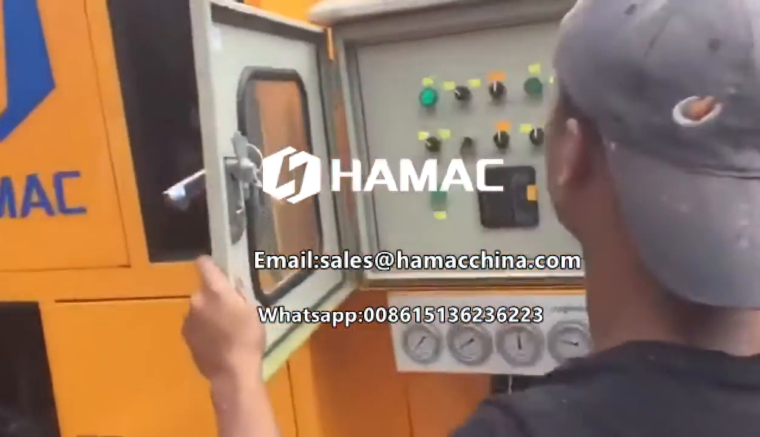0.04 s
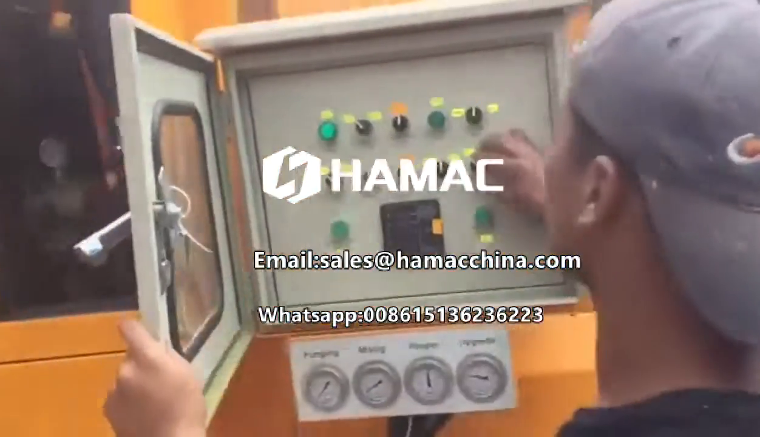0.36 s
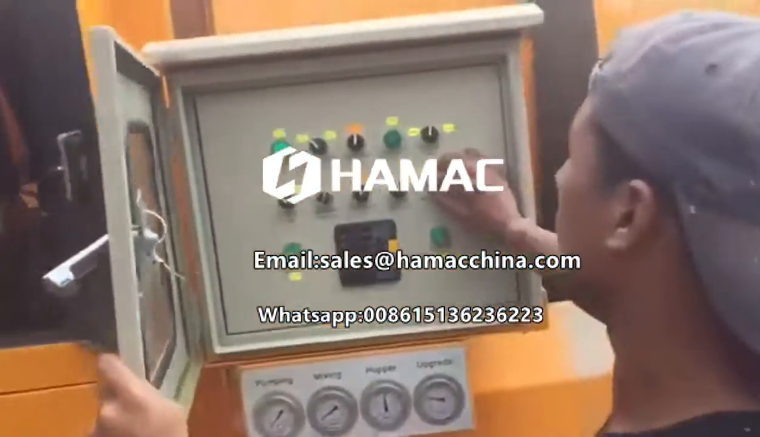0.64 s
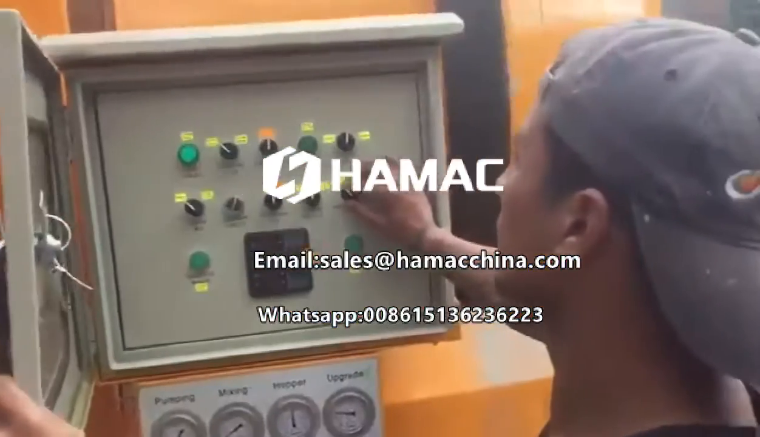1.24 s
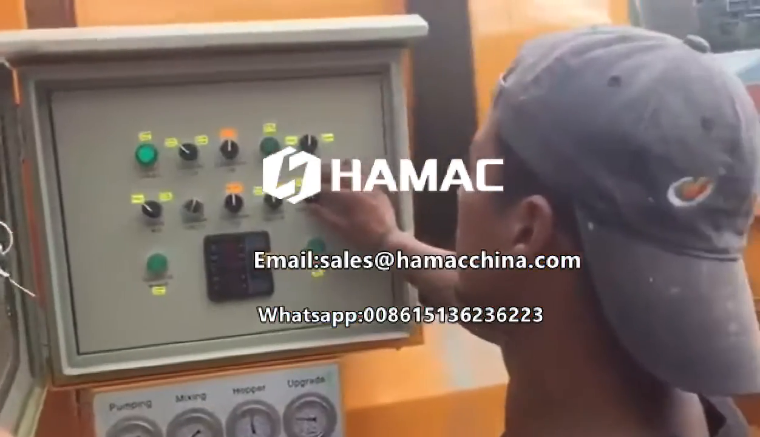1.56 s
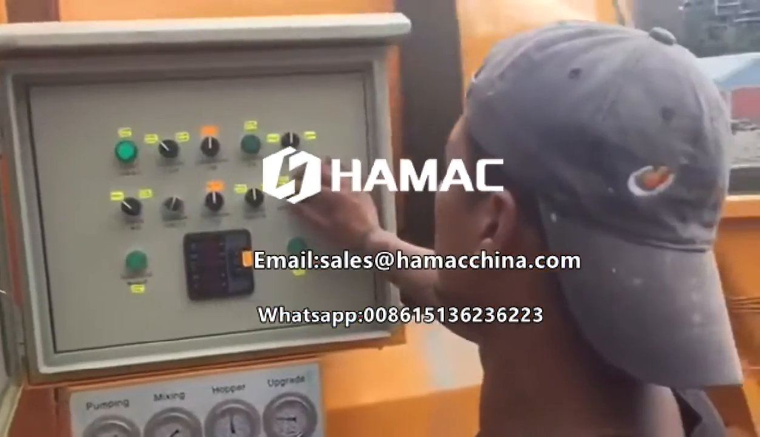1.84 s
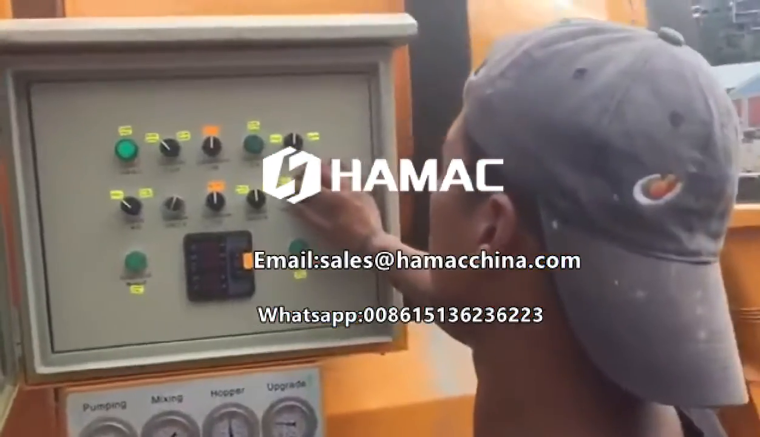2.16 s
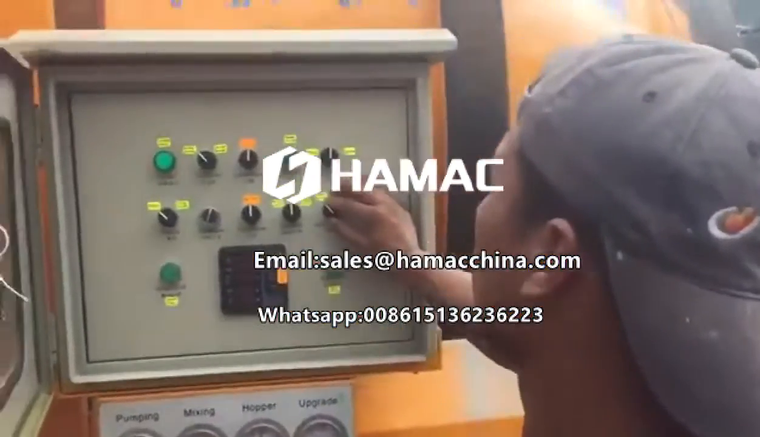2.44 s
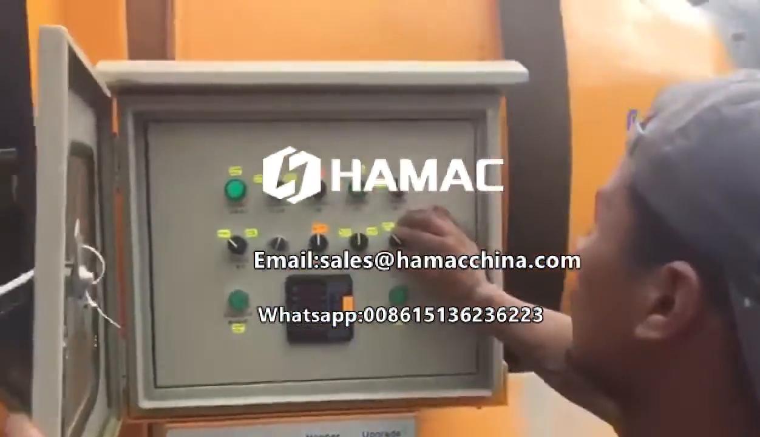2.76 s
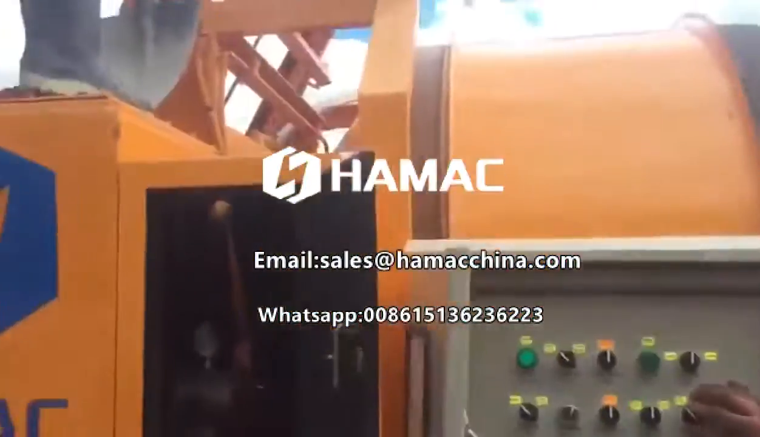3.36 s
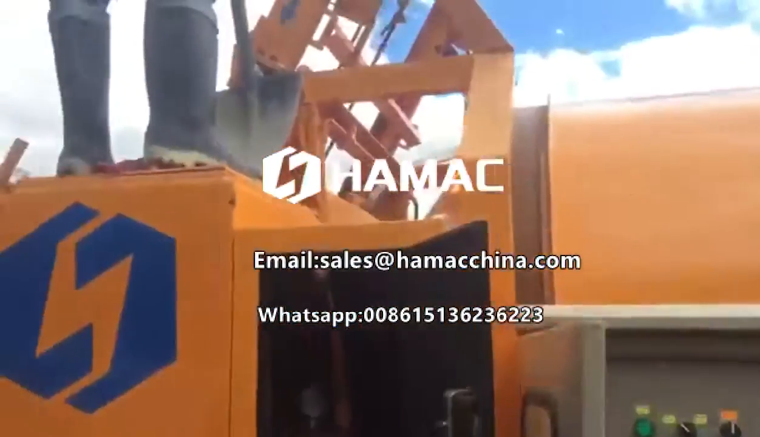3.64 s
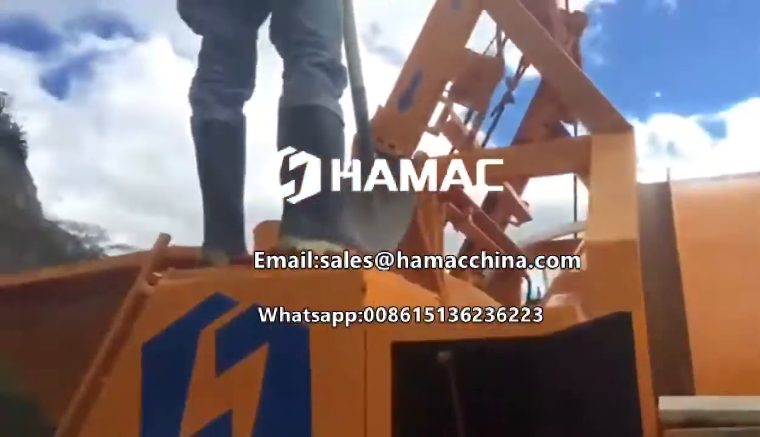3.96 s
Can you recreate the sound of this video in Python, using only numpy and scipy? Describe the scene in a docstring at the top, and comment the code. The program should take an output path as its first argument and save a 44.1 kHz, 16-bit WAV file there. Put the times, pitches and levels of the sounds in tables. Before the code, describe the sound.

A loud diesel drone runs without a break, heard from right beside a concrete mixer pump outdoors. A metal door gives one quick rattle early on, and pulsing fan noise, a low hum and spills of gravel continue throughout.

```python
"""Outdoors, at the control panel of a concrete mixer pump running at steady speed.
A four-cylinder diesel drones in harmonics of its crank rate; its firings excite resonances of the
block and housing, and loose covers ring. A cooling fan hums and roars, modulated by a drive that
throbs about five times a second. A second low hum wanders in pitch, wet gravel slides in the
turning drum, and the cabinet door rattles once."""
import sys
import numpy as np
from scipy import signal
from scipy.fft import rfft, irfft
from scipy.io import wavfile

SR = 44100
rng = np.random.default_rng(int(sys.argv[2]) if len(sys.argv) > 2 else 0)


def dump(signal):
    """Clip the signal to [-1, 1] and save it as 16-bit WAV at the path in sys.argv[1]."""
    limited = np.clip(np.atleast_2d(signal).T, -1, 1)
    pcm = np.round(limited * 32767).astype(np.int16)
    wavfile.write(sys.argv[1], SR, pcm)


N = 176400
T = np.arange(N) / SR
CRANK_HZ, THROB_HZ, FAN_HZ = 25.958, 5.43, 138.52


def from_db(db):
    """Decibels to amplitude ratio."""
    return 10 ** (np.asarray(db) / 20)

def unit_rms(x):
    """Normalisation to unit power."""
    return x / np.sqrt(np.mean(x ** 2) + 1e-20)

def in_time(rows):
    """Linear interpolation of (seconds, value) rows at every sample."""
    return np.interp(T, *np.transpose(rows))

def drift(corner_hz):
    """Low-passed noise: a slow random fluctuation of about unit spread."""
    step = 40  # samples per random value
    pole = np.exp(-2 * np.pi * corner_hz * step / SR)
    slow = signal.lfilter([1], [1, -2 * pole, pole ** 2], rng.standard_normal(N // step + 2002))[2000:]
    return np.interp(np.arange(N) / step, np.arange(len(slow)), unit_rms(slow))

def coloured(x, spectrum):
    """Spectral shaping by (Hz, dB) rows, at unit power."""
    hz, db = np.transpose(spectrum)
    bins = np.maximum(np.arange(N // 2 + 1) * SR / N, 1)
    gain = from_db(np.interp(np.log(bins), np.log(hz), db))
    return unit_rms(irfft(rfft(x) * gain, N))

def swells(rows):
    """A gain with a Gaussian rise or dip in decibels at each (seconds, width, dB) row."""
    return from_db(sum(db * np.exp(-((T - s) / width) ** 2) for s, width, db in rows))

def impacts(per_s, spread_db, range_db):
    """A Poisson process: independent impulses, many soft and a few hard."""
    sizes = from_db(np.minimum(spread_db * rng.exponential(1, N), range_db)) * rng.choice([-1, 1], N)
    return sizes * (rng.random(N) < per_s / SR)


# Spectrum of the rushing air. Each row: frequency in Hz, relative density in dB.
AIR_SPECTRUM = [(20, -6.5), (42, -2.5), (62, 2.5), (90, 4), (160, 1.5), (300, 1), (420, -2), (520, -3.5),
                (750, -3.5), (1100, -6), (1500, -5.5), (2100, -6), (2900, -7.5), (3500, -8.5), (4500, -12),
                (4950, -17), (5650, -13), (6700, -18), (7600, -24.5)]
# Bands that flicker independently. Each entry: band edge in Hz.
AIR_BAND_EDGES = [0, 350, 700, 1400, 2800, 4200, 22050]

def air_roar(turns, throb):
    """Amplitude-modulated noise: rushing air swells with each throb and pulses with the crank."""
    air = rfft(coloured(rng.standard_normal(N), AIR_SPECTRUM))
    hz = np.arange(N // 2 + 1) * SR / N
    out = 0
    for low, high in zip(AIR_BAND_EDGES, AIR_BAND_EDGES[1:]):
        band = irfft(air * (hz >= low) * (hz < high), N)
        angle = 2 * np.pi * (turns + rng.random() / 2)
        pulsing = 1 + 0.18 * (np.cos(angle) + np.cos(7 * angle)) / np.pi
        flicker = from_db(drift(13.4))
        out += band * pulsing * flicker
    return from_db(-20.5 + .5 * np.cos(2 * np.pi * throb)) * out


# Pitch of the low hum. Each row: time in seconds, frequency in Hz.
HUM_PITCH = [(0, 66.2), (1.0, 66.67), (1.7, 67.2), (2.2, 67.7), (3.0, 68.44), (4.0, 67.85)]
# Strength of its fundamental. Each row: time in seconds, level in dB.
HUM_LEVEL = [(0, -26), (.3, -28), (.45, -20), (.62, -25), (.78, -17.5), (.93, -25), (1.08, -20),
             (1.22, -24.5), (1.44, -17), (1.58, -25), (1.82, -18), (2.08, -25.5), (2.3, -19), (2.7, -19),
             (3.03, -23), (3.35, -18.5), (3.68, -22.5), (4, -15.5)]

def low_hum(octave_db=-9):
    """Frequency modulation: a tone and its octave, probably the hydraulic drive, wander under load."""
    phase = 2 * np.pi * np.cumsum(in_time(HUM_PITCH) + 0.45 * drift(3.3)) / SR
    wave = np.sin(phase) + from_db(octave_db) * np.sin(2 * phase)
    return np.sqrt(2) * from_db(in_time(HUM_LEVEL)) * wave


# Taps of the door as it is pushed open. Each row: start in seconds, level in dB.
DOOR_TAPS = [(0.315, -14), (.326, -17), (0.336, -20.5)]
# Spectrum of the door. Each row: frequency in Hz, relative density in dB.
DOOR_SPECTRUM = [(200, -11), (650, -6), (1300, 2), (2800, -5), (4200, -11.5), (5000, -3), (5600, -5),
                 (7600, -9.5)]

def door_rattle(decay_s=0.013):
    """Damped impacts: each tap of the steel door and latch is noise that decays exponentially."""
    taps = sum(from_db(db) * (T >= s) * np.exp(-np.abs(T - s) / decay_s) for s, db in DOOR_TAPS)
    return taps * coloured(rng.standard_normal(N), DOOR_SPECTRUM)


# Slides of gravel. Each row: crest time in seconds, fall time in seconds, level in dB.
GRAVEL_SLIDES = [(0.023, 0.015, -18), (0.183, 0.046, -22), (0.236, 0.034, -20.5), (0.33, 0.065, -20.5),
                 (0.433, 0.041, -19), (0.548, 0.073, -18.5), (0.699, 0.032, -20.5), (0.738, 0.027, -22),
                 (0.807, 0.021, -21), (.95, .04, -19.5), (1.07, 0.039, -21.5), (1.118, 0.028, -32),
                 (1.285, .03, -22), (1.357, 0.019, -18), (1.452, 0.026, -22), (1.67, 0.044, -21.5),
                 (1.727, 0.043, -21), (1.84, 0.033, -18), (1.99, 0.019, -30), (2.207, 0.049, -20),
                 (2.3, .03, -27), (2.39, 0.037, -20.5), (2.51, 0.037, -22), (2.573, .03, -22.5),
                 (2.718, .04, -25), (2.957, 0.022, -19), (3.191, 0.043, -18.5), (3.311, 0.043, -28.5),
                 (3.509, 0.035, -17.5), (3.651, .03, -21.5), (3.714, .03, -22), (3.856, 0.038, -20),
                 (3.909, .03, -18.5)]
# Spectrum of the gravel. Each row: frequency in Hz, relative density in dB.
GRAVEL_SPECTRUM = [(200, -10), (600, -2.5), (1300, -1.5), (2700, 1), (3400, -4), (4300, -8.5), (4950, -13),
                   (5400, -5.5), (6200, -11.5), (7600, -13)]

def gravel(rise_ratio=.6):
    """Superposed impacts: stones on the steel drum merge into spills that rise faster than they die."""
    envelope = 0
    for crest, fall, db in GRAVEL_SLIDES:
        width = fall * np.where(T < crest, rise_ratio, 1)
        envelope += from_db(db) * np.exp(-2 * ((T - crest) / width) ** 2)
    stones = impacts(per_s=2500, spread_db=1.5, range_db=6)
    return envelope * coloured(stones, GRAVEL_SPECTRUM)


# Fan partials. Each row: multiple of the fan tone, offset in throb rates, level in dB.
FAN_PARTIALS = [(.5, 0, -34), (1, 0, -19.5), (1, 1, -30), (2, 0, -36), (2, -1, -38)]
# The tone dips on some throbs. Each row: centre in seconds, width in seconds, gain in dB.
FAN_DIPS = [(.27, 0.019, -9), (.45, 0.034, -6), (.84, .05, -5), (1.03, 0.043, -6), (1.23, 0.033, -9.5),
            (1.42, 0.028, -10), (1.59, 0.032, -6), (1.76, 0.034, -4), (2.11, .03, -14), (2.47, 0.041, -15),
            (3.04, 0.049, -19), (3.42, 0.043, -15), (3.79, 0.022, -11)]

def fan_tone(throb):
    """Beating: sidebands one throb rate from the fan's partials make it pulse with the drive."""
    blades = FAN_HZ * T + rng.random() + 0.018 * drift(2.1)
    tone = sum(from_db(db) * np.sin(2 * np.pi * (multiple * blades + offset * throb))
               for multiple, offset, db in FAN_PARTIALS)
    return np.sqrt(2) * swells(FAN_DIPS) * tone


# Modes of the steel covers. Each row: frequency in Hz, time to decay 60 dB in seconds, level in dB.
COVER_MODES = [(940, .05, -40), (1076, 0.05, -39.5), (1191, 0.093, -36), (1257, 0.071, -39.5),
               (1482, 0.038, -41.5), (1690, 0.071, -38), (1858, 0.078, -41), (2054, .06, -40),
               (2220, 0.09, -37), (2497, 0.09, -38), (2635, .06, -41.5), (2680, 0.1, -37),
               (2755, 0.068, -39.5), (2915, 0.076, -39), (3056, 0.072, -40), (3380, 0.056, -43),
               (3960, 0.03, -42.5), (4480, .04, -45), (5270, 0.038, -43), (5330, 0.024, -46),
               (5640, 0.034, -46.5), (6600, 0.041, -49.5)]

def loose_covers():
    """Free vibration: each cover, tapped at random, rings as a damped oscillator."""
    out = 0
    for hz, t60, db in COVER_MODES:
        taps = impacts(per_s=24, spread_db=3.5, range_db=10.5)
        radius = from_db(-60 / (t60 * SR))
        feedback = [1, -2 * radius * np.cos(2 * np.pi * hz / SR), radius ** 2]
        out += from_db(db) * unit_rms(signal.lfilter([1, 0, -1], feedback, taps + 1e-18))
    return out


def firings(turns, decay_s, uneven_db=0.4):
    """Pulsed excitation: two decaying noise bursts per crank turn, slightly unequal in strength."""
    count = np.floor(2 * turns).astype(int)
    strength = from_db(uneven_db * rng.standard_normal(512))
    age_s = (2 * turns % 1) / (2 * CRANK_HZ)
    return strength[count % len(strength)] * np.exp(-age_s / decay_s) * rng.standard_normal(N)

def driven_modes(turns, modes, decay_s):
    """Forced resonance: every mode is excited once per firing, at a crank angle of its own."""
    out = 0
    for hz, half_width, db in modes:
        force = firings(turns + rng.random(), decay_s)
        band = signal.butter(1, [hz - half_width, hz + half_width], "band", fs=SR, output="sos")
        ringing = signal.sosfilt(band, signal.sosfilt(band, force))  # twice, for steep flanks
        out += from_db(db) * unit_rms(ringing)
    return out


# Modes of the block and covers. Each row: frequency in Hz, filter half-width in Hz, level in dB.
BLOCK_MODES = [(556.5, 29, -39), (630.6, 42, -34.5), (939, 45, -36.5), (1173, 43, -39), (1582, 54, -41.5),
               (2244, 32, -43.5), (2460, 51, -40.5), (2704, 45, -39), (3700, 130, -47.5), (5310, 110, -43)]

def combustion_knock(turns):
    """Shock excitation: each combustion rings the block and covers."""
    return driven_modes(turns, BLOCK_MODES, decay_s=0.0083)


# Modes of the housing. Each row: frequency in Hz, filter half-width in Hz, level in dB.
HOUSING_MODES = [(199, 15, -33.5), (241.6, 36.5, -30.5), (293.3, 36, -31.5)]
# Sidebands of the housing tone. Each row: offset in throb rates, level in dB.
HOUSING_SIDEBANDS = [(-4, -37), (-3, -39), (-2, -38.5), (1, -36.5), (2, -32.5)]
# Swells as the engine takes load. Each row: centre in seconds, width in seconds, gain in dB.
LOAD_SWELLS = [(.055, .04, 6), (.131, 0.014, 5), (.224, 0.052, 3.5), (.55, 0.037, 4), (.75, 0.08, 2.5),
               (.933, 0.044, 6), (1.107, 0.025, 4.5), (1.17, 0.036, 7), (1.339, 0.029, 6),
               (1.61, 0.033, 6.5), (1.821, 0.064, 4), (2.014, 0.043, 1.5), (2.199, 0.042, 3.5),
               (2.363, .04, 3.5), (2.532, 0.028, 4.5), (2.614, 0.032, 5.5), (2.72, .04, -1),
               (2.792, 0.066, 6.5), (2.905, 0.047, 5.5), (3.053, 0.04, 0), (3.17, 0.055, 4),
               (3.353, .05, 7), (3.531, 0.022, 9.5), (3.719, 0.04, 5), (3.873, 0.058, 3)]

def housing_boom(turns, throb, order=12):
    """Resonance: exhaust pulses boom in the housing, and sidebands around one engine order warble."""
    boom = driven_modes(turns, HOUSING_MODES, decay_s=0.0048)
    warble = sum(from_db(db) * np.sin(2 * np.pi * (order * turns + offset * throb + rng.random()))
                 for offset, db in HOUSING_SIDEBANDS)
    return swells(LOAD_SWELLS) * (boom + np.sqrt(2) * warble)


# Engine orders. Each row: multiple of the crank rate, relative level in dB.
ENGINE_ORDERS = [(2, -25.5), (3, -29), (4, -30), (5, -36), (6, -37.5), (7, -36.5), (8, -35.5), (9, -43),
                 (10, -40.5), (12, -31.5), (14, -40), (15, -43), (16, -43), (17, -44.5), (18, -42),
                 (20, -43), (21, -41.5), (22, -38.5), (24, -49), (26, -44), (27, -49), (31, -44.5),
                 (33, -46.5), (36, -48), (39, -43), (43, -50.5), (45, -45.5), (46, -47), (50, -40.5),
                 (52, -47)]

def engine_drone(turns, gain_db=-0.5):
    """A harmonic series locked to the crank; the higher orders flutter more in amplitude."""
    out = 0
    for order, db in ENGINE_ORDERS:
        wave = np.sqrt(2) * np.sin(2 * np.pi * (order * turns + rng.random()))
        flutter = 1 + 0.019 * order * drift(2.9)
        out += from_db(db + gain_db) * wave * flutter
    return out


# Clatter and air as the listener moves. Each row: time in seconds, gain in dB.
NEARNESS = [(0, 1.7), (.4, 1.4), (.8, 1.5), (1.5, 0.7), (2.1, 0.4), (2.6, 1), (3.1, 0.4), (4, 0.4)]

def scene():
    """Superposition: all parts of the machine add at one listening point."""
    turns = np.cumsum(CRANK_HZ * (1 + .0008 * drift(1.8))) / SR
    throb = THROB_HZ * (T - .018)  # phase in cycles, first crest at 18 ms
    knock = combustion_knock(turns)
    boom = housing_boom(turns, throb)
    surge_db = 0.72 * drift(13)
    clatter = from_db(in_time(NEARNESS) + surge_db) * (knock + loose_covers() + air_roar(turns, throb))
    return (engine_drone(turns) + boom + fan_tone(throb) + low_hum() + clatter
            + gravel() + door_rattle())[None]

def record(dry, ceiling=.9, cutoff_hz=7580):
    """Clipping and band limiting: the tallest peaks are flattened and the top is cut steeply."""
    lowpass = signal.ellip(14, .1, 90, cutoff_hz, fs=SR, output="sos")
    return signal.sosfilt(lowpass, np.clip(dry, -ceiling, ceiling))


dry = scene()
out = record(dry)
dump(out)
```